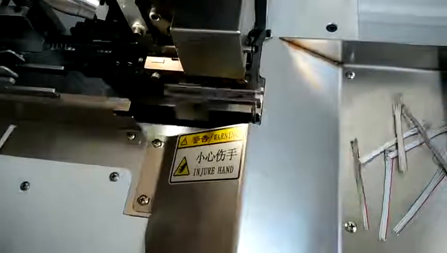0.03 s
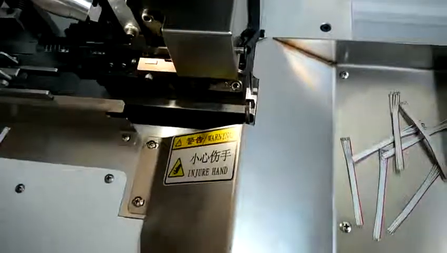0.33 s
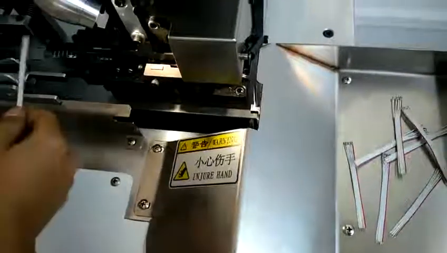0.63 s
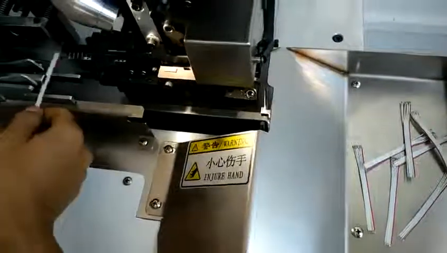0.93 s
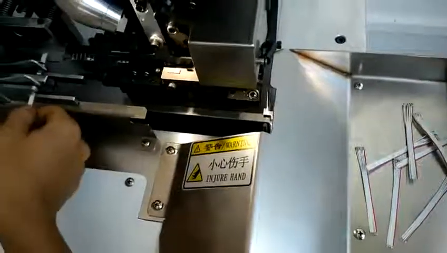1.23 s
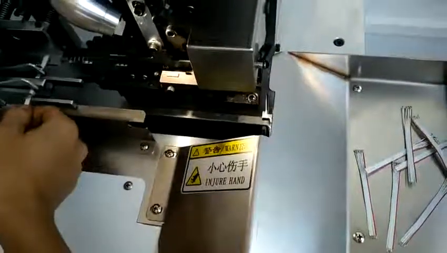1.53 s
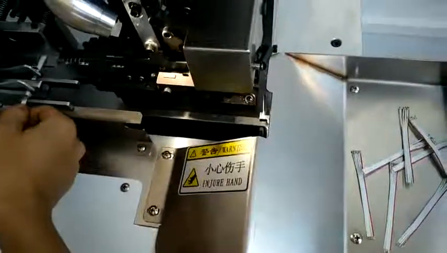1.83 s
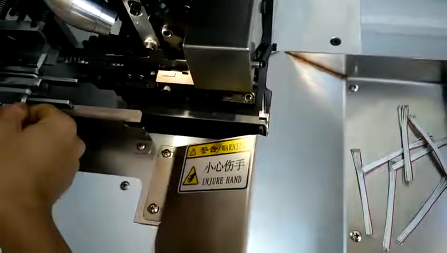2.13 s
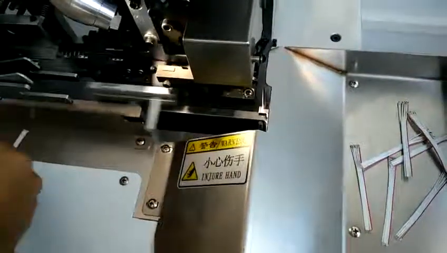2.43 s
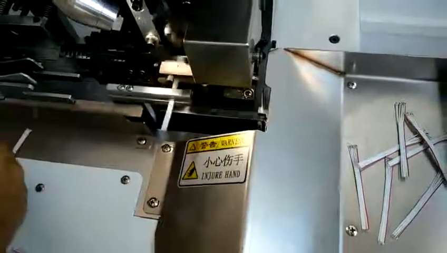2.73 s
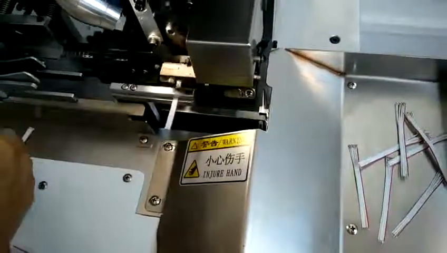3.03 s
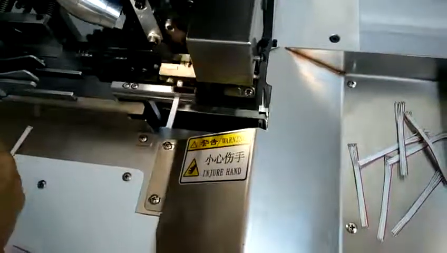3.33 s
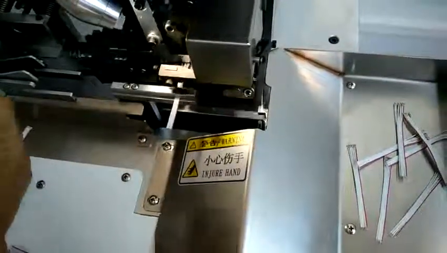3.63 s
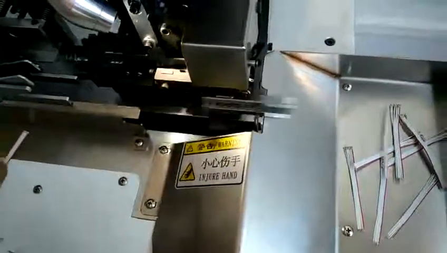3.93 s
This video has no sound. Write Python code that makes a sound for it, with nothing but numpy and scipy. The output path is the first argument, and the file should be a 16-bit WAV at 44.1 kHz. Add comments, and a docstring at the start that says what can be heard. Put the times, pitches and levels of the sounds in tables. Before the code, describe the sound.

A cable crimping machine hums, clunks, then hammers out seven rapid metallic press strokes.

```python
"""A cable crimping machine idles in a workshop, its fan and low hum running throughout.
First the carriage rattles out along its rail and stops with a puff of air and a long thin ring.
After a pause an air cylinder slams, a clamp shuts and the carriage brings the cable in with a squeak.
The press then makes seven quick, nearly identical strokes, each a fixed sequence of steel clicks,
clanks and knocks over gear noise. Last, the carriage runs out again with a puff and two clunks."""
import sys
import numpy as np
from scipy import signal
from scipy.fft import rfft, irfft
from scipy.io import wavfile
from scipy.ndimage import uniform_filter1d

SR = 44100
rng = np.random.default_rng(int(sys.argv[2]) if len(sys.argv) > 2 else 0)


def file_out(sig):
    """Save sig as 16-bit WAV at sys.argv[1]."""
    # one column per channel
    cols = np.atleast_2d(sig).T
    # limit, then scale
    lim = np.clip(cols, -1, 1)
    pcm = np.round(lim * 32767).astype(np.int16)
    wavfile.write(sys.argv[1], SR, pcm)


N = 176400
T = np.arange(N) / SR
HIT_T = T[:SR * 3 // 4]  # time axis of one hit

# the die closes, once a stroke (t/s, level/dB)
STROKES = [(2.6981, -1), (2.8510, -1), (3.0043, 0), (3.1577, 0), (3.3112, 0), (3.4647, 0), (3.6180, 0)]
# hits in a stroke, timed from the die closing (t/s, tick/dB, click/dB, clank/dB, knock/dB, thud/dB)
STROKE_HITS = [(-.049, -60, -38, -17, -32, -20), (-.042, -60, -45, -36, -12, -29),
               (-.0278, -34, -43, -18.5, -20, -22.5), (-.017, -45, -49, -14, -33, -29),
               (-.0095, -60, -45, -21, -17, -25.5), (-.006, -70, -57, -33, -36, -17.5),
               (0, -31.5, -18, -20.5, -30, -30), (.013, -54, -38, -12, -16, -19.5),
               (.026, -50, -23.5, -12.5, -22, -20.5), (.039, -52, -29, -18.5, -32, -28),
               (.051, -55, -41, -18.5, -29, -16), (.0595, -45, -32, -13.5, -43, -25.5),
               (.066, -36, -45, -26.5, -11, -18), (.079, -60, -53, -30, -28, -20)]
# tone of the gears (f/Hz, level/dB)
GEAR_EQ = [(40, -24), (100, -25), (140, -1), (320, -4.5), (420, -9.5), (550, -9.5), (900, 2.5), (1350, -23),
           (1600, -11.5), (2100, -3.5), (3000, -30), (4000, -11.5), (6600, -28), (8700, -53), (12000, -37),
           (15500, -52)]
# gear envelope, timed from the die closing (t/s, level/dB)
GEAR_ENVELOPE = [(-.035, -22), (0, -23.5), (.03, -22.5), (.07, -23.5), (.118, -26)]
# how much of a stroke repeats exactly (f/Hz, share of power)
REPEAT_SHARE = [(800, 0.9), (2000, 0.64), (4500, 0.34), (12000, 0.38)]
# ring of the press column (f/Hz, level/dB, t60/s)
COLUMN_MODES = [(156, -36, .6), (186, -34, .5), (326, -28, .4), (469, -22.5, .6), (735, -28, .4),
                (802, -28, .3), (880, -17, .33), (972, -25, .35), (1010, -26, .4), (1246, -32, .4),
                (1336, -27, .4), (1995, -33, .4)]
def press():
    """Each turn of the crank plays the same hits and gears and rings the column; treble varies most."""
    preroll_s, column_lead_s = 0.05, 0.02  # ahead of the die closing
    clutch_s = 2.666
    def stroke_spectrum(play_s):
        stroke = rattle(GEAR_EQ, size=SR) * envelope(GEAR_ENVELOPE, T[:SR] - preroll_s)
        for s, *levels in STROKE_HITS:
            slop = play_s * rng.standard_normal()  # play in the linkage loosens the timing
            add(stroke, preroll_s + s + slop, steel_hit(*levels, rise_s=0.00048))
        return rfft(stroke)
    repeated = stroke_spectrum(play_s=0)
    share = read(REPEAT_SHARE, np.fft.rfftfreq(SR, 1 / SR))
    column = attack(HIT_T, rise_s=0.008) * ring(COLUMN_MODES)
    out = np.zeros(N)
    for s, db in STROKES:
        fresh = stroke_spectrum(play_s=0.0004)
        blend = irfft(np.sqrt(share) * repeated + np.sqrt(1 - share) * fresh, SR)
        add(out, s - preroll_s, amp(db) * blend)
        add(out, s - column_lead_s, amp(db) * column)
    return out * attack(T - clutch_s, rise_s=0.0023)  # silent until the clutch engages


# treble snap of contact (f/Hz, level/dB)
TICK_EQ = [(3000, -21), (7000, 5), (8800, -6), (10500, -3), (12500, 3), (15300, -4.5)]
# bright steel click (f/Hz, level/dB)
CLICK_EQ = [(500, -45), (2500, -18.5), (4500, -2.5), (5800, 0.5), (6800, 4), (7700, -3), (8800, -21),
            (10500, -18.5), (13000, -25), (15500, -32)]
# midrange clank of the linkage (f/Hz, level/dB)
CLANK_EQ = [(100, -35), (300, -15.5), (550, -5.5), (750, -5.5), (1250, 2), (1650, -6), (2100, -1.5),
            (2600, -6.5), (3000, -1), (3600, -9.5), (6500, -16.5), (8800, -52), (15000, -73)]
# low thud of the cabinet (f/Hz, level/dB)
THUD_EQ = [(30, -45), (70, -15), (105, -38.5), (140, -6.5), (230, -3), (320, 6), (390, -3), (600, -13.5),
           (1200, -33), (5000, -66)]
# ping of the die and cylinder rods (f/Hz, level/dB, t60/s)
STEEL_MODES = [(3160, -18.5, 0.31), (4430, -19, 0.45), (6550, -24, 0.45), (6730, -8, 0.21),
               (6870, -18.5, 0.11)]
# knock of the frame (f/Hz, level/dB, t60/s)
FRAME_MODES = [(783, -14, 0.078), (884, -7.5, .11), (946, 0, 0.058), (1003, -9.5, 0.13), (1324, -18, 0.14)]
def steel_hit(tick_db, click_db, clank_db, knock_db, thud_db, rise_s):
    """Steel meets steel: a bright transient on top, frame and cabinet swelling just behind it."""
    after_ring = amp(-14.5) * np.exp(-HIT_T / 0.041)
    def burst(eq, decay_s):
        noise = colour(rng.standard_normal(len(HIT_T)), eq, ripple_db=1.5)
        return noise * (np.exp(-HIT_T / decay_s) + after_ring)
    tick = amp(tick_db) * burst(TICK_EQ, decay_s=0.0071)
    click = amp(click_db) * (burst(CLICK_EQ, decay_s=0.0079) + ring(STEEL_MODES))
    clank = amp(clank_db) * burst(CLANK_EQ, decay_s=0.0064)
    knock = amp(knock_db) * ring(FRAME_MODES)
    thud = amp(thud_db) * burst(THUD_EQ, decay_s=0.0094)
    body = attack(HIT_T, rise_s=0.0027) * (knock + thud)
    return attack(HIT_T, rise_s) * (tick + click + clank + body)


# cylinder, clamp and carriage hits (t/s, rise/s, tick/dB, click/dB, clank/dB, knock/dB, thud/dB)
SINGLE_HITS = [(.002, 0.0034, -38, -31, -26, -25, -23), (0.0334, 0.0016, -29.5, -36, -22.5, -9.5, -19),
               (.137, 0.0016, -60, -55, -33, -46, -36), (.348, 0.0053, -52, -58, -31, -29, -24),
               (2.162, .001, -47, -45, -41, -53, -60), (2.184, 0.014, -52, -43, -16, -13, -22),
               (2.213, 0.0025, -21, -17.5, -14.5, -31, -27), (2.221, 0.0025, -34, -22, -16, -6, -12.5),
               (2.3761, 0.003, -23.5, -18.5, -11, -18, -15), (2.642, 0.0015, -67, -50, -28, -44, -30),
               (3.903, 0.001, -31.5, -24, -25.5, -20, -18), (3.953, 0.0014, -29, -36, -20.5, -10, -22.5)]
# clang of the air cylinder (f/Hz, level/dB, t60/s)
CYLINDER_MODES = [(323, -24, .25), (473, -18, 0.27), (633.6, -17.5, 0.18), (972, -24, 0.25),
                  (1443, -21, 0.23), (1730, -21, 0.13), (3009, -42, .25), (4600, -20.5, 0.13),
                  (5120, -22, .18), (5600, -32, .2), (6200, -26, 0.14), (6360, -35, .19), (6751, -32, .17)]
# clang of the clamp (f/Hz, level/dB, t60/s)
CLAMP_MODES = [(424, -19, 0.19), (466.5, -19, 0.25), (556, -17, 0.14), (1060, -15, .13), (1182, -16.5, .12),
               (1270, -21, 0.13), (1420, -22, 0.077), (3200, -25, 0.081), (5170, -28, .2), (5480, -33, .25)]
# dull ring of the buffer that brakes the carriage (f/Hz, level/dB, t60/s)
BUFFER_MODES = [(351, -27, 0.28), (573, -28.5, .3), (630, -25.5, 0.31), (1820, -34, .2)]
# bright ring of the rail's end stop (f/Hz, level/dB, t60/s)
END_STOP_MODES = [(2240, -34, .13), (3020, -26, .15), (4250, -36, .2), (7150, -40, .3)]
# long thin tail of the rail (f/Hz, level/dB, t60/s)
RAIL_MODES = [(5330, -48, 1.7), (5420, -49, 1.5)]
def clunks():
    """Cylinder, clamp and carriage reach their stops and ring."""
    cylinder_s, clamp_s, buffer_s, end_stop_s = 2.214, 2.3765, 0.342, 0.393
    out = np.zeros(N)
    for s, rise_s, *levels in SINGLE_HITS:
        add(out, s, steel_hit(*levels, rise_s=rise_s))
    add(out, cylinder_s, bolted_ring(CYLINDER_MODES, rise_s=0.0071))
    add(out, clamp_s, bolted_ring(CLAMP_MODES, rise_s=0.002))
    add(out, buffer_s, bolted_ring(BUFFER_MODES, rise_s=0.015))
    add(out, end_stop_s, bolted_ring(END_STOP_MODES, rise_s=0.018))
    add(out, end_stop_s, ring(RAIL_MODES))
    return out


def bolted_ring(modes, rise_s, voices=5, detune=0.011):
    """Bolted parts split each mode into several close ones that beat."""
    split = [(hz * (1 + detune * rng.uniform(-1.02, 1)), db, t60)
             for hz, db, t60 in modes for _ in range(voices)]
    beating = sum(rng.choice([-1, 1]) * ring([mode]) for mode in split)
    return attack(HIT_T, rise_s) * beating / np.sqrt(voices)


# one envelope for each run of the carriage (t/s, level/dB)
CARRIAGE_RUNS = [
    [(0, -25), (.08, -26.5), (.12, -26.5), (.21, -27.5), (.33, -26.5), (.37, -26.5), (.4, -47)],
    [(2.23, -20), (2.3, -31.5), (2.38, -29), (2.44, -22.5), (2.53, -24), (2.57, -32), (2.66, -33.5)],
    [(3.69, -33), (3.77, -34.5), (3.86, -24.5), (3.94, -28), (4, -27.5)],
]
# tone of the carriage rolling (f/Hz, level/dB)
CARRIAGE_EQ = [(40, -22), (100, -19.5), (170, -8.5), (260, -5.5), (400, -2), (550, -3), (700, -5.5),
               (1400, -9), (1800, -4), (2250, -5), (3000, -12.5), (3600, -18), (5000, -22.5), (6700, -27.5),
               (8700, -45.5), (13000, -39), (15500, -46)]
# thin squeaks of the slide (t/s, length/s, level/dB)
SQUEAKS = [(2.607, 0.086, -44.5), (3.701, 0.13, -64)]
def carriage():
    """The carriage rattles along its rail and squeaks thinly at the press."""
    rolling = rattle(CARRIAGE_EQ, size=N) * sum(envelope(run, T) for run in CARRIAGE_RUNS)
    squeak_swell = sum(amp(db) * np.sin(np.pi * attack(T - s, length) ** 0.75)
                       for s, length, db in SQUEAKS)
    return rolling + squeak_swell * narrow_noise(hz=11700, width_hz=110)


def rattle(eq, size, impacts_per_s=900, decay_s=0.0015):
    """Dense small impacts of rolling parts over their rubbing noise."""
    impacts = 1. * (rng.random(size) < impacts_per_s / SR)
    decays = signal.lfilter([1], [1, -np.exp(-1 / (decay_s * SR))], impacts)
    ticks = decays * rng.standard_normal(size)
    rubbing = rng.standard_normal(size)
    return colour(rubbing + amp(-5) * unit(ticks), eq, ripple_db=2.5)


# puffs from the valves (t/s, rise/s, hold/s, decay/s, level/dB)
PUFFS = [(0, 0.0021, 0.037, 0.02, -28), (0.38, 0.018, 0.021, 0.03, -27),
         (2.186, 0.027, 0.029, 0.035, -23.5), (2.328, 0.023, 0.057, 0.035, -34),
         (3.86, 0.018, .075, 0.035, -30.5)]
# hiss of the exhaust (f/Hz, level/dB)
EXHAUST_EQ = [(500, 4), (2000, -4), (3000, 3), (3600, -5.5), (4700, 3), (6500, 3), (7600, -6), (8800, -22),
              (10500, -16), (12700, -9), (15500, -17)]
def air_valves():
    """Valves vent through a resonant exhaust."""
    flow = np.zeros(N)
    for s, rise, hold, decay, db in PUFFS:
        release = np.exp(-np.maximum(T - s - rise - hold, 0) / decay)
        flow += amp(db) * attack(T - s, rise) * release
    return flow * colour(rng.standard_normal(N), EXHAUST_EQ)


# tone of the fan (f/Hz, level/dB)
FAN_EQ = [(15, -42), (25, -24), (53, -5), (99, -15.5), (144, -5.5), (173, -10), (193, -6.5), (253, -2.5),
          (297, -9.5), (331, -7), (457, -10.5), (552, -9), (741, -13), (804, -11), (1530, -13.5),
          (2060, -11), (6730, -26), (9050, -47.5), (15500, -39)]
# bands of the hum (f/Hz, width/Hz, level/dB)
HUM_BANDS = [(264, 18, -53), (215, 42, -53.5), (316, 22, -58.5), (48, 9.1, -66)]
def idle():
    """The bed: fan noise and a low, unsteady hum."""
    fan = amp(-43) * colour(rng.standard_normal(N), FAN_EQ, ripple_db=-0.1)
    hum = sum(amp(db) * narrow_noise(hz, width) for hz, width, db in HUM_BANDS)
    return fan + hum


# reverb time of the workshop (f/Hz, t60/s)
ROOM_DECAY = [(100, 1), (500, 1), (2500, 0.85), (6000, 0.84), (14000, 0.33)]
def room(x, predelay_s=0.006):
    """The workshop's tail, each band dying at its own speed."""
    noise = rng.standard_normal(SR) * (T[:SR] > predelay_s)
    hz, t, bands = signal.stft(noise, SR, nperseg=256)
    fade = amp(-60 * t / read(ROOM_DECAY, hz)[:, None])
    _, tail = signal.istft(bands * fade, SR, nperseg=256)
    return signal.fftconvolve(x, tail / np.linalg.norm(tail))[:N]


def ring(modes):
    """Dying modes, struck from rest."""
    return sum(amp(db - 60 * HIT_T / t60) * np.sin(2 * np.pi * hz * HIT_T) for hz, db, t60 in modes)


def colour(x, eq, ripple_db=0):
    """EQs x, with narrow random resonances if asked, and scales it to rms 1."""
    hz = np.fft.rfftfreq(len(x), 1 / SR)
    ripple = np.interp(hz, np.linspace(0, SR / 2, 400), rng.standard_normal(400))
    return unit(irfft(rfft(x) * amp(read(eq, hz) + ripple_db * ripple), len(x)))


def narrow_noise(hz, width_hz):
    """Noise in one narrow resonance."""
    offset_hz = np.fft.rfftfreq(N, 1 / SR) - hz
    return unit(irfft(rfft(rng.standard_normal(N)) / (1 + (offset_hz / width_hz) ** 2), N))


def envelope(points, t):
    """Smoothed gain from a dB curve, silent outside it."""
    s, db = np.transpose(points)
    gate = (t >= s[0]) & (t <= s[-1])
    return uniform_filter1d(amp(np.interp(t, s, db)) * gate, size=300)


def attack(t, rise_s):
    """Linear ramp from 0 to 1, starting at t = 0."""
    return np.clip(t / rise_s, 0, 1)


def read(points, hz):
    """Reads a table on a log-frequency axis."""
    f, value = np.transpose(points)
    return np.interp(np.log(hz + 1), np.log(f + 1), value)


def add(mix, s, sound):
    """Mixes a sound in at s seconds."""
    part = mix[max(round(s * SR), 0):][:len(sound)]
    part += sound[:len(part)]


def amp(db):
    """Decibels to gain."""
    return 10 ** (np.asarray(db) / 20)


def unit(x):
    """Scales to rms 1."""
    return x / np.sqrt(np.mean(x ** 2) + 1e-20)


def scene():
    """The machine in its room, in mono; its deep bass is thinned below about 76 Hz."""
    low_cut = signal.butter(2, 76, "highpass", fs=SR, output="sos")
    machine = signal.sosfilt(low_cut, press() + clunks() + carriage() + air_valves())
    return (machine + amp(-7.5) * room(machine) + idle())[None]


def record(dry):
    """Clips at full scale, then cuts the top end."""
    high_cut = signal.firwin(511, 15600, window=("kaiser", 9), fs=SR)
    return signal.oaconvolve(np.clip(dry, -1, 1), high_cut[None], "same")


dry = scene()
out = record(dry)
file_out(out)
```